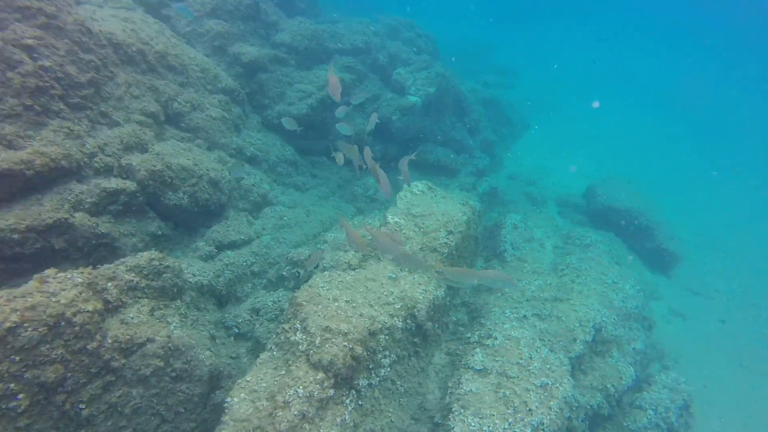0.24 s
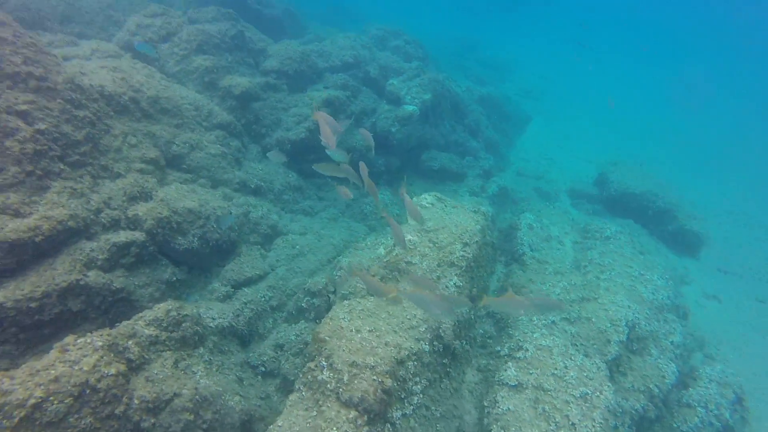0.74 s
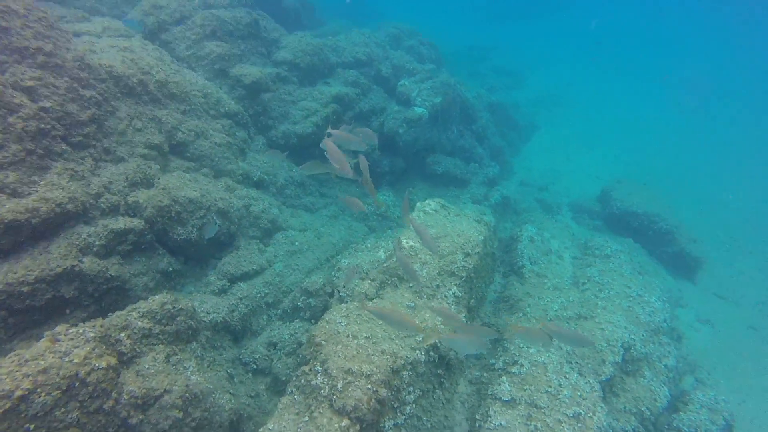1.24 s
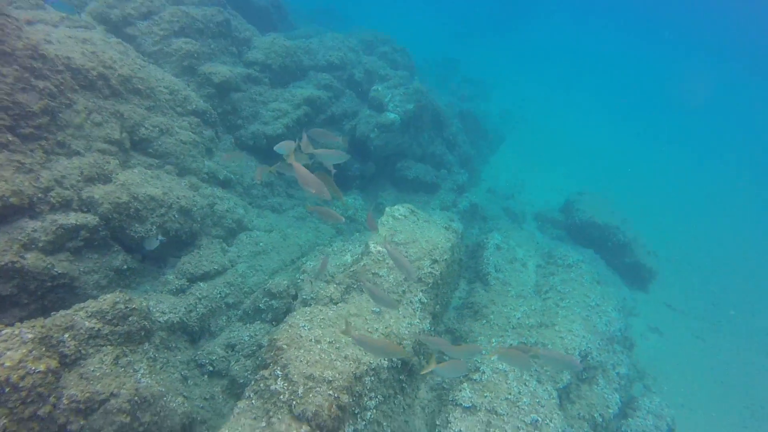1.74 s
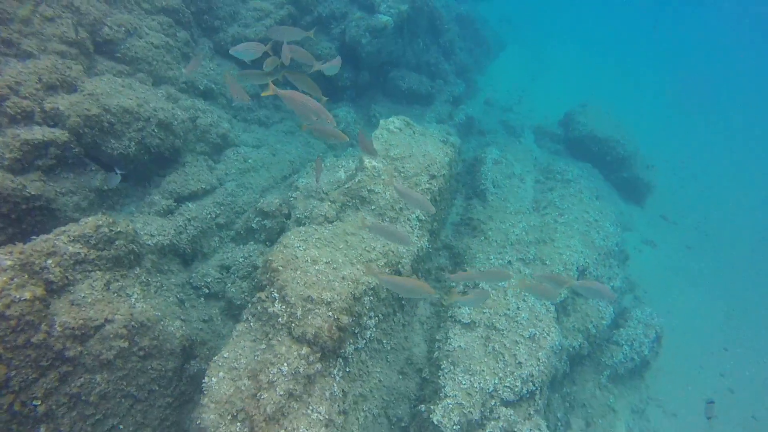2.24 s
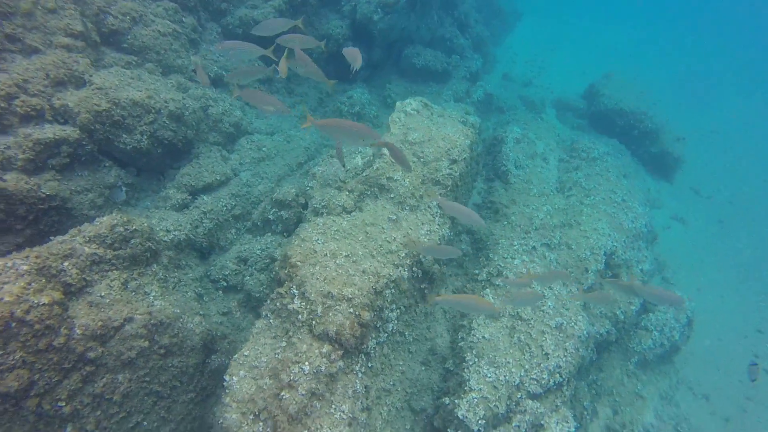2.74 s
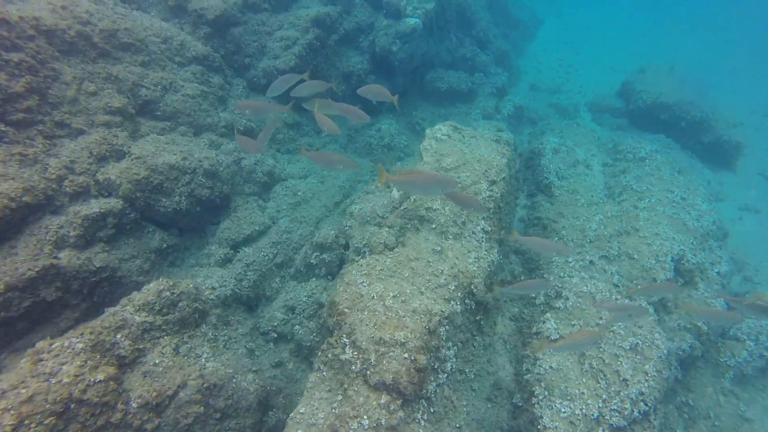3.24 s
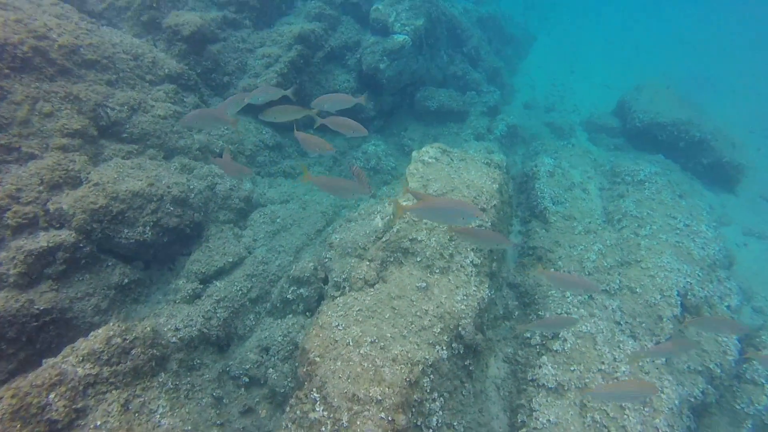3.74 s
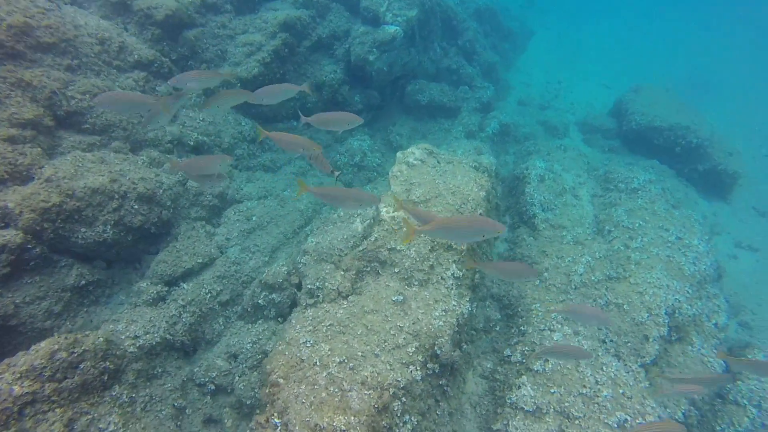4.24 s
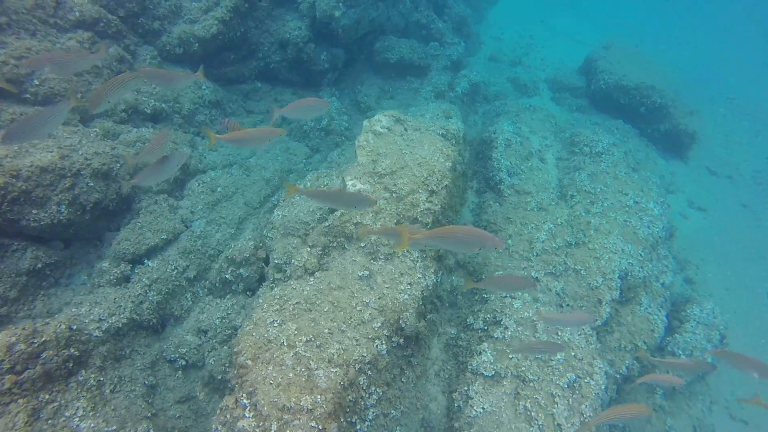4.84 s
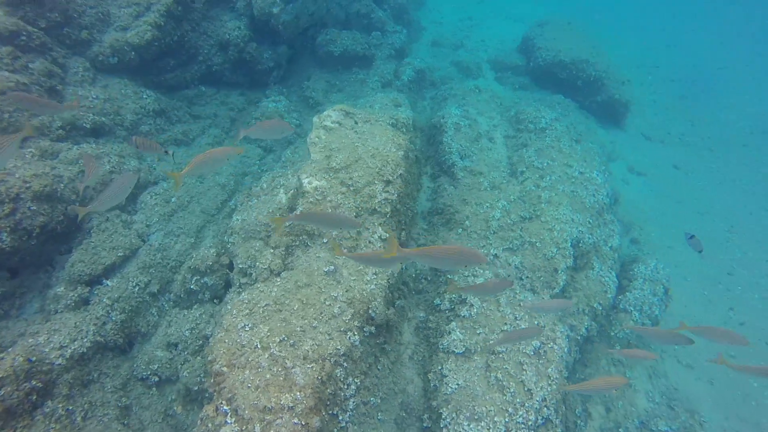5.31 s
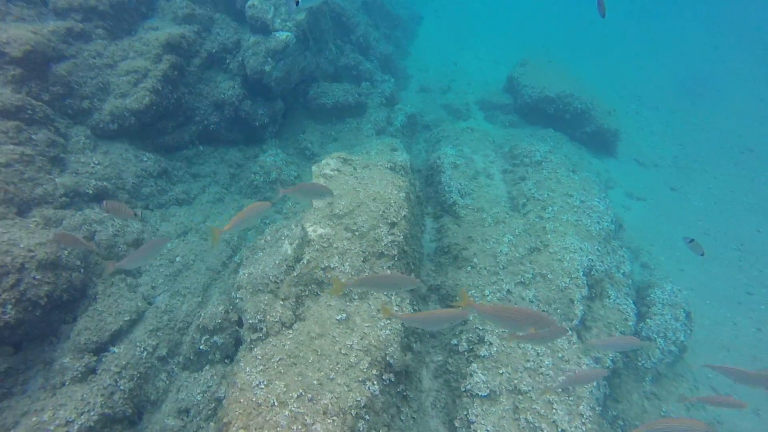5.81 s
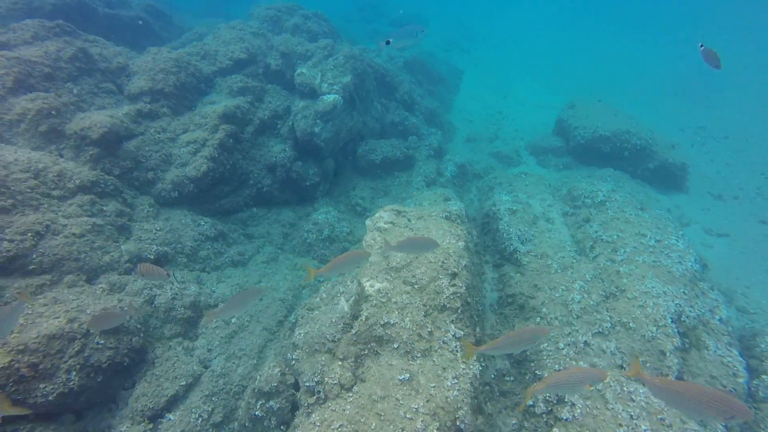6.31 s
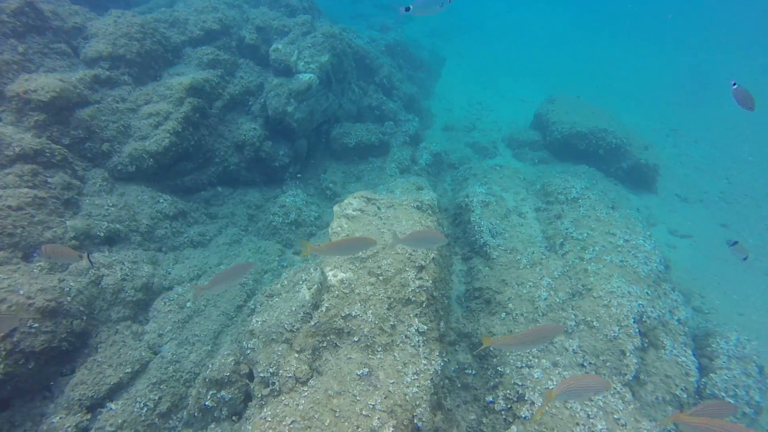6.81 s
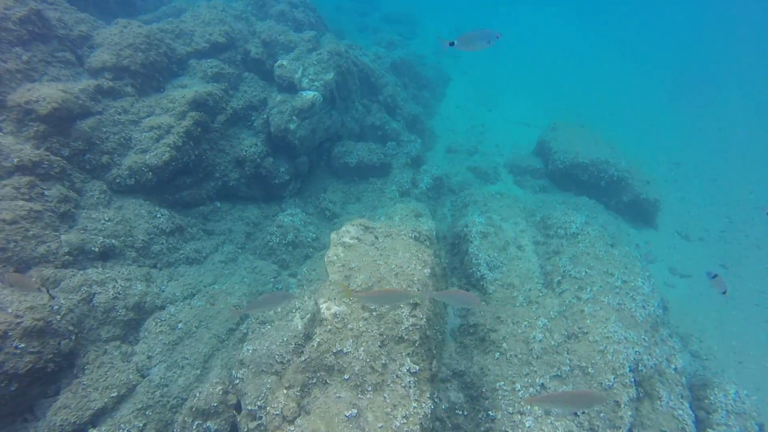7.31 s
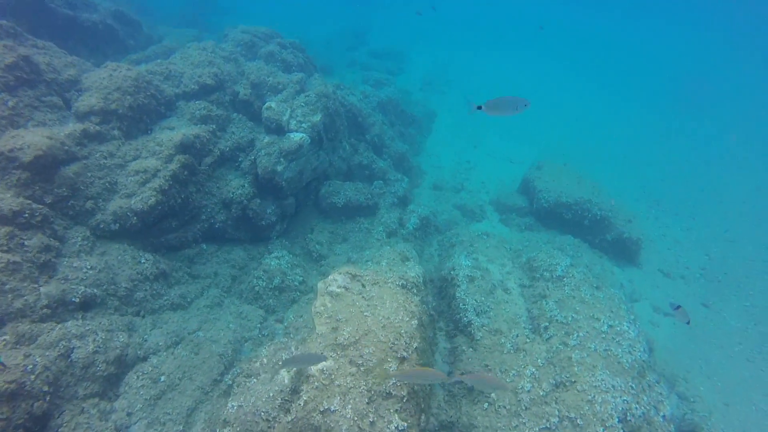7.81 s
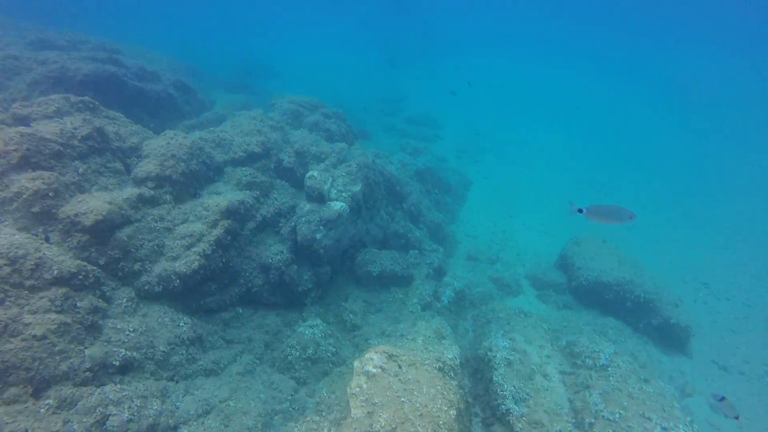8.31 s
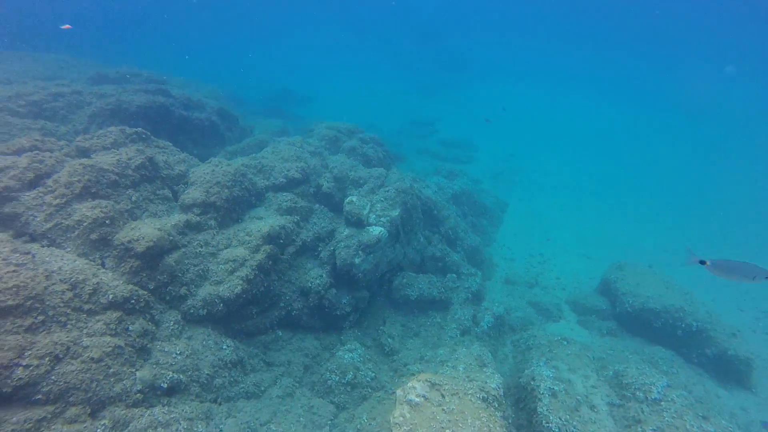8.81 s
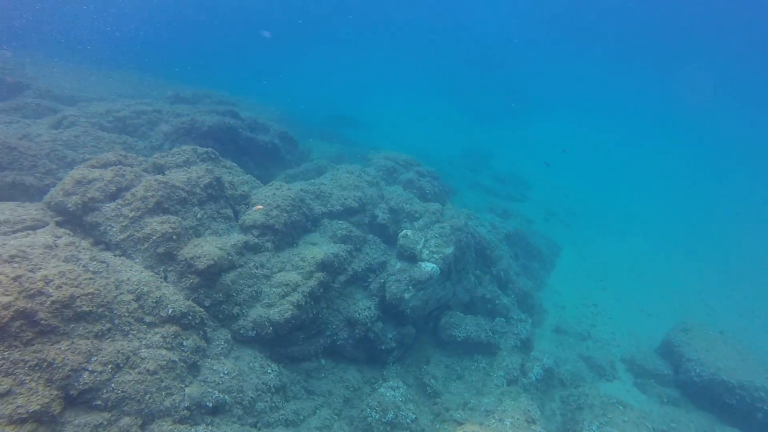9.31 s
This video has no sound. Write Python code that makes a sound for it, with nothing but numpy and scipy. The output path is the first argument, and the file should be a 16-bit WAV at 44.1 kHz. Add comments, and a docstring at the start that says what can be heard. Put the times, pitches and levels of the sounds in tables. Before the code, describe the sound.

Underwater on a rocky reef, a muffled steady hiss carries the fine crackle and scattered ticks of snapping shrimp. Early on, two sharp knocks with low thumps hit the camera housing. A loud, grainy rushing rub follows for about a second, with a bump near its end. Then the quiet hiss returns, with small clicks and a few faint bubbles, all heard from inside a watertight case.

```python
"""A rushing rub slides along a watertight camera housing, a grainy hiss over a low rumble.
Just before, the grip sticks and slips on the case in sharp knocks, with low handling thumps for body.
Behind it lies a rocky reef: far shrimp snaps merge into a hiss and near ones tick, all coloured by the
housing, with a few bubbles between them. A limiter ducks the sea after each overload."""
import sys
import numpy as np
from scipy import signal
from scipy.fft import rfft, irfft
from scipy.io import wavfile
from scipy.ndimage import uniform_filter1d, minimum_filter1d

SR = 44100
rng = np.random.default_rng(int(sys.argv[2]) if len(sys.argv) > 2 else 0)


def to_wav(s):
    """Save 16-bit WAV."""
    ch = np.atleast_2d(s).T  # columns
    pcm = np.round(np.clip(ch, -1, 1) * 32767)  # PCM
    wavfile.write(sys.argv[1], SR, pcm.astype(np.int16))


N = 421155
TIME = np.arange(N) / SR
SHORT = 4096   # samples in a one-shot or a filter's ring

# How the housing passes sound. Each row: frequency in Hz, gain in dB.
HOUSING_EQ = [(100, -9), (400, -13), (700, -8), (1200, -29), (1550, -22.5), (2300, -10), (3000, -19.5),
              (4000, -26.5), (6000, -33.5), (9000, -38), (11000, -46.5), (14000, -45), (16000, -74)]
# Its resonances and notches. Each row: centre in Hz, width in Hz, gain in dB.
HOUSING_RESONANCES = [(650, 340, 9), (1754, 285, 16.5), (2130, 234, -9), (2656, 330, 7), (3020, 56, -12.5),
                      (3400, 550, 3.5), (3900, 100, -11), (7580, 490, -9), (7780, 190, 10)]
# How the wall rings when touched directly. Each row: centre in Hz, width in Hz, gain in dB.
WALL_RESONANCES = [(341, 60, 4), (505, 142, -7), (650, 146, 8.5), (947, 68, 3.5), (1190, 45, 6),
                   (1243, 98, -6), (1411, 157, 9.5), (1700, 220, 4), (1907, 36, 2.5), (2030, 270, -1.5),
                   (2360, 224, 9.5), (3430, 120, -8.5), (3950, 190, -4), (4190, 200, 12.5), (4570, 120, 3),
                   (5150, 300, 10.5), (5400, 150, -9), (5800, 410, 3.5)]
# Tone of the far reef's hiss. Each row: frequency in Hz, gain in dB.
HISS_EQ = [(20, 12.5), (40, 14), (80, 1), (150, -1.5), (650, 1), (1200, 5), (1800, -5), (2600, 1.5),
           (5000, -3.5), (9000, 3), (15000, -9.5)]
# Tone of the mid-distance crackle. Each row: frequency in Hz, gain in dB.
CRACKLE_EQ = [(100, -13.5), (650, 4), (1700, -2.5), (4000, -1.5), (8000, 0.5), (15000, 0.5)]
# The closest shrimp snaps. Each row: start in seconds, level in dB, then the tone ahead of the housing:
# hump in Hz, roll-off above it in dB per octave.
CLOSE_SNAPS = [(.0285, -12, 3900, 16), (0.6203, -34.5, 3450, 13), (0.7336, -33, 1860, -4),
               (0.9846, -25, 2280, 11), (1.075, -33.5, 1800, 4), (1.128, -29, 3000, 12),
               (1.175, -13, 2570, 14), (1.2597, -25.5, 3780, 2.5), (1.6534, -32.5, 6800, 16),
               (3.14, -30.5, 2900, 21), (3.437, -29.5, 3020, 7), (3.457, -32, 2790, 16),
               (3.647, -36.5, 3950, 0), (3.7468, -32.5, 2980, 5), (3.7871, -33.5, 4300, 3),
               (3.913, -30, 2400, 0), (3.9457, -31.5, 1810, 8), (4.0118, -31, 2130, 3),
               (4.095, -29, 2800, 8), (4.246, -41.5, 8100, 10), (4.757, -31, 2420, 7),
               (5.0538, -25, 4000, 7), (5.137, -36.5, 6900, 10), (5.2703, -26.5, 2880, 9),
               (5.7345, -31, 2880, 19), (5.9325, -30.5, 2210, 13), (5.9498, -23.5, 3450, 11),
               (6.1392, -31.5, 4760, 15), (6.1738, -27, 1740, 5), (6.6282, -30.5, 2190, 2),
               (7.0784, -31, 2400, 2.5), (7.3575, -25, 1700, 3), (7.5092, -34.5, 3700, 22),
               (7.764, -21.5, 2270, 16), (8.175, -31, 1700, 0.5), (8.806, -29, 3000, 2),
               (8.8212, -28.5, 3220, 22), (9.044, -41.5, 8100, 3), (9.236, -23, 1820, 8),
               (9.3495, -32.5, 3500, 28)]
# Short pings: the housing ringing after the first loud snap, then bubbles.
# Each row: start in seconds, peak in dB, starting pitch in Hz.
PING_CUES = [(.029, -18, 710), (2.213, -5, 2390), (2.246, -5.5, 2410), (2.297, -1.5, 2470),
             (3.52, -38, 920), (4.65, -33, 570), (5.825, -33, 880), (6.295, -39, 450), (7.24, -33, 665),
             (7.876, -30.5, 650)]
# Low handling thumps. Each row: midpoint in seconds, level in dB, pitch in Hz, length in cycles.
THUMP_CUES = [(1.299, -9.5, 55, 0.94), (1.33, -4, 65.4, 1.8), (1.348, -9, 201, 2.06),
              (1.391, -11.5, 196, 6.05), (1.415, -19.5, 75, 3), (1.597, -23, 96, 1.2),
              (1.7169, 1, 82, 2.56), (2.328, -5.5, 55, 1.84), (2.511, -4.5, 67, 1.58),
              (2.843, 1, 121, 1.86), (2.922, 5, 61.5, 0.86), (7.064, -31.5, 153, 0.89)]
# Runs of the grip sticking and slipping. Each row: start in seconds, rough length in seconds,
# starting rate in slips per second, peak in dB, low-pass cutoff in Hz.
SLIP_RUNS = [(1.3215, 0.0046, 680, -7, 1390), (1.34, 0.0067, 560, -2, 1100),
             (1.364, 0.016, 405, -11.5, 1080), (1.3783, 0.029, 185, -2, 890), (1.385, .02, 745, -5.5, 1000),
             (1.587, 0.013, 270, -24.5, 352), (1.701, .0027, 600, -16, 808), (1.7089, 0.024, 300, 12, 430),
             (1.899, 0.0066, 315, -12, 614), (2.84, 0.0055, 345, 7.5, 410),
             (3.232, 0.0075, 260, -25.5, 298.3), (3.266, 0.014, 250, -22.5, 858)]
# Tone of the slipping grip. Each row: frequency in Hz, gain in dB.
GRIP_EQ = [(40, -4), (250, 2.5), (800, -3), (1150, -12.5), (1600, -3), (2300, -11.5), (3200, 2),
           (4000, -15.5), (5500, -18), (7000, -42), (15000, -40)]
# Tone of the rumble under the rub. Each row: frequency in Hz, gain in dB.
RUMBLE_EQ = [(15, -13.5), (40, -8.5), (80, -0.5), (130, -4), (180, -22.5), (400, -14.5), (1000, -91)]
# Tone of the rub's grainy hiss. Each row: frequency in Hz, gain in dB.
RUB_EQ = [(60, -9.5), (200, -4), (500, -2.5), (1000, -1.5), (1600, -3.5), (2600, -6.5), (3100, -16.5),
          (3800, -27), (5500, -37.5), (7000, -49), (10500, -60.5), (12000, -75), (16000, -89.5)]

# The rub sets in, reaches full strength, turns dull when the case is bumped, and dies away.
RUB_START_S, RUB_FULL_S, BUMP_S, RUB_STOP_S = 1.953, 2.25, 2.83, 3.078


def from_db(db):
    """Decibels to gain."""
    return 10 ** (np.asarray(db) / 20)


def rms_one(x):
    """Scale to rms 1."""
    return x / np.sqrt(np.mean(x ** 2) + 1e-20)


def peak_one(x):
    """Scale to peak 1."""
    return x / (np.abs(x).max() + 1e-20)


def add(out, start_s, sound):
    """Drop a one-shot into the track."""
    start = max(round(start_s * SR), 0)
    out[start:start + len(sound)] += sound[:N - start]


def wander(count):
    """A random fader ride through count evenly spaced points of spread 1."""
    return np.interp(TIME, np.linspace(0, TIME[-1], count), rng.standard_normal(count))


def colour(x, eq, resonances=()):
    """Minimum-phase EQ: a smooth curve with resonances and notches on it."""
    hz = np.arange(SHORT + 1) * SR / (2 * SHORT) + 1
    points_hz, gains_db = np.transpose(eq)
    db = np.interp(np.log(hz), np.log(points_hz), gains_db)
    for centre, width, height in resonances:
        db = db + height / (1 + (2 * (hz - centre) / width) ** 2)
    cepstrum = irfft(np.log(from_db(db)))
    cepstrum[1:SHORT] *= 2   # folded so that all ringing follows the hit
    cepstrum[SHORT + 1:] = 0
    impulse_response = irfft(np.exp(rfft(cepstrum)))[:SHORT]
    return signal.fftconvolve(x, impulse_response)[:len(x)]


def through_housing(x):
    """Sound from the water picks up the ring of the housing on its way in."""
    return colour(x, HOUSING_EQ, HOUSING_RESONANCES)


def collapse(bend_hz=2500, bend_width_hz=2600):
    """A cavity collapses in a click; stones scatter it and bending waves in the wall make it a chirp."""
    t = TIME[:SHORT]
    pulse = 1. * (t == 0)
    for level_db, t60_s in ((-1, 0.014), (-9, 0.05)):   # scatter off stones, then a tail off rocks
        tail = rng.standard_normal(SHORT) * from_db(-60 * t / t60_s)
        pulse = pulse + from_db(level_db) * tail / np.linalg.norm(tail)
    radius = np.exp(-np.pi * bend_width_hz / SR)
    poles = np.array([1, -2 * radius * np.cos(2 * np.pi * bend_hz / SR), radius ** 2])
    for _ in range(4):   # all-pass stages smear the click
        pulse = signal.lfilter(poles[::-1], poles, pulse)
    return pulse


def snap(hz, rise_db, fall_db):
    """The cavity's size sets a hump in the snap's tone; the slopes either side are in dB per octave."""
    hump = [(hz / 2 ** 4, -4 * rise_db), (hz, 0), (hz * 2 ** 4, -4 * fall_db)]
    return colour(collapse(), hump)


def housed_snap(level_db, hz, fall_db, length_s=.005):
    """A snap heard through the housing; its level is the rms with all its energy packed into length_s."""
    ring = through_housing(snap(hz, rise_db=11.5, fall_db=fall_db))
    return from_db(level_db) * ring * np.sqrt(length_s * SR) / np.linalg.norm(ring)


def far_shrimp(level_db=-40.5, swell_db=1.0):
    """The bed: the whole reef's snaps merge into a hiss that swells a little."""
    hiss = through_housing(colour(rng.standard_normal(N), HISS_EQ))
    return from_db(level_db + swell_db * wander(count=60)) * rms_one(hiss)


def shrimp_crackle(level_db=-48.5, snaps_per_s=330, spread_db=4.5, colonies=16):
    """Colonies in the middle distance snap at random, each with its own pitch and path over the rocks."""
    out = np.zeros(N)
    for hz in np.geomspace(1900, 12000, colonies):
        pulse = snap(hz, rise_db=11, fall_db=15)
        gaps, strengths = -np.log(rng.random((800, 2))).T
        starts = np.cumsum(gaps) * colonies / snaps_per_s
        gains = from_db(spread_db * np.minimum(strengths, 2.96))
        for start_s, gain in zip(starts[starts < TIME[-1]], gains):
            add(out, start_s, gain * pulse)
    return from_db(level_db) * rms_one(through_housing(colour(out, CRACKLE_EQ)))


def shrimp_sparkle(softest_db=-48, low_hz=7000, high_hz=14000, count=34):
    """The tiniest close snaps put thin ticks in the top end."""
    out = np.zeros(N)
    for when, loud, high in rng.random((count, 3)):
        hz = low_hz * (high_hz / low_hz) ** high
        tick = colour(snap(hz, rise_db=22, fall_db=10), HOUSING_EQ)
        peak_db = softest_db - np.log(max(loud, .05))
        add(out, when * TIME[-1], from_db(peak_db) * peak_one(tick))
    return out


def stray_shrimp(level_db=-39.5, spread_db=3, low_hz=3400, high_hz=6000, count=44):
    """Shrimp a little way off tick at random, each with its own strength, pitch and brightness."""
    out = np.zeros(N)
    for when, loud, high, dull in rng.random((count, 4)):
        hz = low_hz * (high_hz / low_hz) ** high
        tick = housed_snap(level_db + spread_db * (loud - high), hz, fall_db=4 + 24 * dull)
        add(out, when * TIME[-1], tick)
    return out


def near_shrimp():
    """Single snaps up close ring the housing."""
    out = np.zeros(N)
    for start_s, level_db, hz, fall_db in CLOSE_SNAPS:
        add(out, start_s, housed_snap(level_db, hz, fall_db))
    return out


def pings(decay_cycles=14, glide=.3, gurgle_db=-40, gurgle_hz=640, count=70):
    """The housing or a bubble rings briefly, bending slightly up; faint bubbles gurgle among the rocks."""
    out, t = np.zeros(N), TIME[:SHORT]
    starts = rng.uniform(0, TIME[-1], count)
    gurgles = [(start_s, gurgle_db + 6.5 * loud, gurgle_hz * 2 ** (0.14 * high))
               for start_s, (loud, high) in zip(starts, rng.standard_normal((count, 2)))]
    for start_s, peak_db, hz in list(PING_CUES) + gurgles:
        envelope = t * from_db(-60 * t * hz / decay_cycles)
        ring = envelope * np.sin(2 * np.pi * hz * t * (1 + glide * t))
        add(out, start_s, from_db(peak_db) * peak_one(ring))
    return out


def handling_thumps(sway_hz=30, sway_db=-12.5, sway_t60_s=0.27):
    """Low thumps give the knocks their body, rocking the case and leaving it swaying in the sub-bass."""
    out, after = np.zeros(N), TIME[:SR // 2]
    sway = from_db(sway_db - 60 * after / sway_t60_s) * np.sin(2 * np.pi * sway_hz * after)
    for middle_s, level_db, hz, cycles in THUMP_CUES:
        length_s = cycles / hz
        t = TIME[TIME < length_s]
        thump = np.sin(np.pi * t / length_s) * np.cos(2 * np.pi * hz * t)
        add(out, middle_s - length_s / 2, from_db(level_db) * thump)
        add(out, middle_s, from_db(level_db) * sway)
    return out


def grip_knocks(jitter=0.044, speedup_per_s=2, unevenness_db=1.5, grit_db=-30):
    """Each knock is a quickening run of slips that rings the wall; a softer contact is duller."""
    out, t = np.zeros(N), TIME[:SHORT]
    for start_s, length_s, slips_per_s, peak_db, cutoff_hz in SLIP_RUNS:
        friction = from_db(grit_db) * rng.standard_normal(SHORT) * (t < length_s)
        for k, (late, strength) in enumerate(rng.standard_normal((20, 2))):
            if k < length_s * slips_per_s:
                steady_s = abs(k + jitter * late) / slips_per_s
                slip_s = steady_s / (1 + speedup_per_s * steady_s)
                friction[int(slip_s * SR) % SHORT] -= from_db(unevenness_db * strength)
        softened = signal.sosfilt(signal.butter(2, cutoff_hz, fs=SR, output="sos"), friction)
        knock = colour(softened, GRIP_EQ, WALL_RESONANCES)
        add(out, start_s, from_db(peak_db) * peak_one(knock))
    return out


def rub_envelope(attack_db_per_s=905, swell_db_per_s=19, lull_s=2.36, lull_db=5.5):
    """Level of the rub in dB against full strength: attack, swell, one lull, release."""
    attack = attack_db_per_s * np.maximum(RUB_START_S - TIME, 0)
    swell = swell_db_per_s * np.maximum(RUB_FULL_S - TIME, 0)
    lull = lull_db * np.exp(-((TIME - lull_s) / 0.029) ** 2)
    release = 30.5 * (np.maximum(TIME - RUB_STOP_S, 0) / 0.058) ** 2   # 30.5 dB down after 58 ms
    return -np.minimum(attack + swell + lull + release, 400)


def rub_rumble(envelope_db, base_db=-23.5, growth_db_per_s=8):
    """A low rumble in the case builds as long as the rub lasts."""
    growth_db = growth_db_per_s * (np.minimum(TIME, RUB_STOP_S) - RUB_FULL_S)
    rumble = rms_one(colour(rng.standard_normal(N), RUMBLE_EQ))
    return rumble * from_db(base_db + 0.48 * envelope_db + growth_db)


def rub_hiss(envelope_db, base_db=-16, grains_per_s=4000, spread_db=1.5, flutter_db=1.5, split_hz=1700):
    """Dense grains of friction ring the wall in a fluttering hiss; a stronger rub is brighter."""
    hits = rng.random(N) < grains_per_s / SR
    gains = from_db(spread_db * np.minimum(rng.exponential(1, N), 4))
    grains = hits * gains * rng.choice([-1, 1], N)
    bright = rms_one(colour(grains, RUB_EQ, WALL_RESONANCES))
    body = signal.sosfilt(signal.butter(1, split_hz, fs=SR, output="sos"), bright)
    bumped = np.clip((TIME - BUMP_S) / 0.031 + .5, 0, 1)
    treble_db = 3 + 1.4 * envelope_db - 8.5 * bumped   # the top opens with the rub; the bump dulls it
    hiss = body + (bright - body) * from_db(treble_db)
    return hiss * from_db(base_db + envelope_db + flutter_db * wander(count=700))


def rushing_rub(surge_db=3.5, surge_rise_s=0.068):
    """A rub slides along the case, grainy hiss over low rumble, and surges after the bump."""
    envelope_db = rub_envelope()
    surge = np.clip((TIME - BUMP_S) / surge_rise_s, 0, 1)
    return (rub_hiss(envelope_db) + rub_rumble(envelope_db)) * from_db(surge_db * surge)


def scene():
    """A mono mix: the reef behind, and all that touches the case up front."""
    reef = far_shrimp() + shrimp_crackle() + shrimp_sparkle() + stray_shrimp() + near_shrimp() + pings()
    return (reef + grip_knocks() + handling_thumps() + rushing_rub())[None]


def record(dry, ceiling_db=-1, hold_s=0.26, release_s=0.32, cutoff_hz=15700):
    """A limiter pulls the gain down at once, holds it and lets it creep back; the top is cut."""
    over_db = np.maximum(20 * np.log10(np.abs(dry[0]) + 1e-9) - ceiling_db, 0)
    half_hold = int(hold_s * SR / 2)
    held_db = -minimum_filter1d(-over_db, size=2 * half_hold + 1, origin=half_hold)
    fading = np.exp(-TIME / release_s)
    released_db = np.maximum.accumulate(held_db / fading) * fading
    look_ahead_db = -minimum_filter1d(-released_db, size=160)
    duck_db = uniform_filter1d(look_ahead_db, size=160)
    high_cut = signal.ellip(10, .1, 80, cutoff_hz, fs=SR, output="sos")
    return signal.sosfilt(high_cut, dry * from_db(-duck_db))


dry = scene()
out = record(dry)
to_wav(out)
```